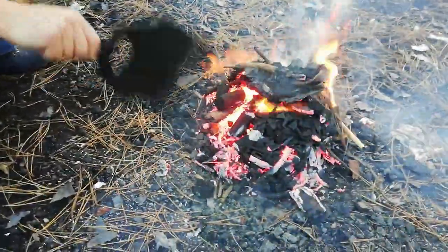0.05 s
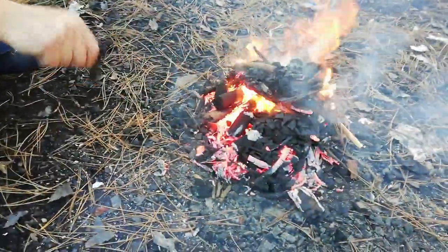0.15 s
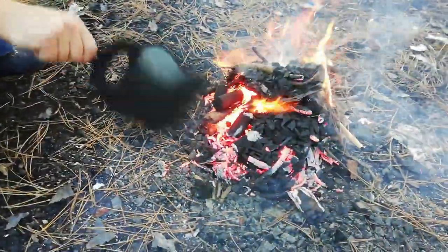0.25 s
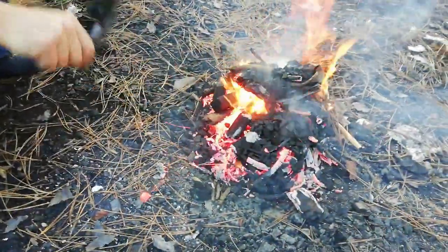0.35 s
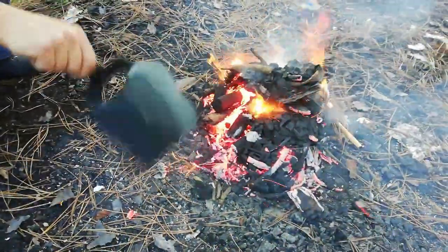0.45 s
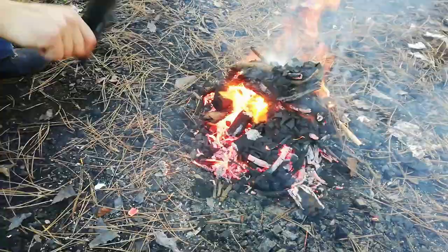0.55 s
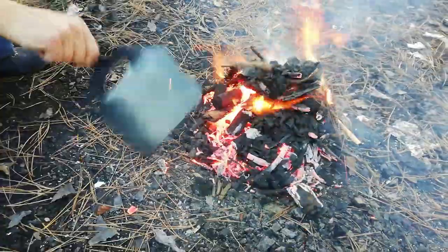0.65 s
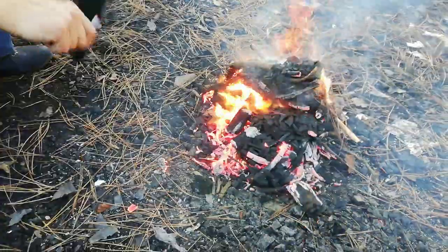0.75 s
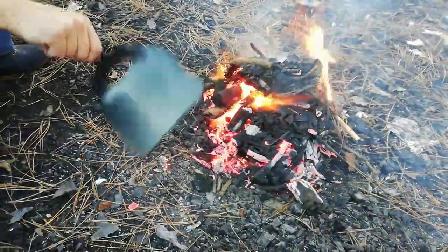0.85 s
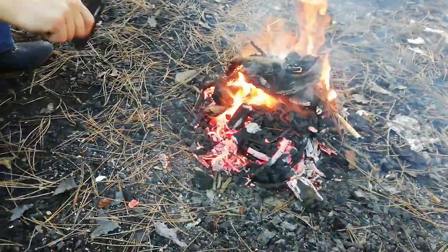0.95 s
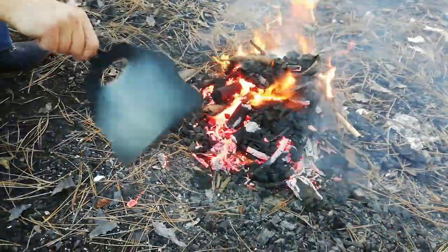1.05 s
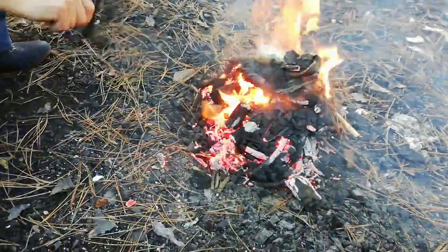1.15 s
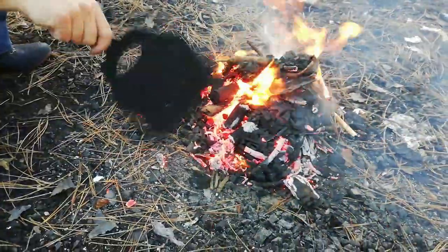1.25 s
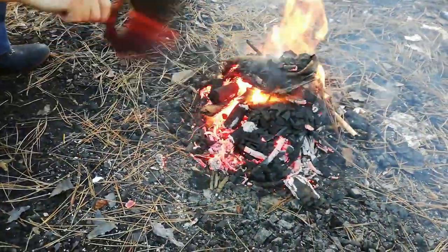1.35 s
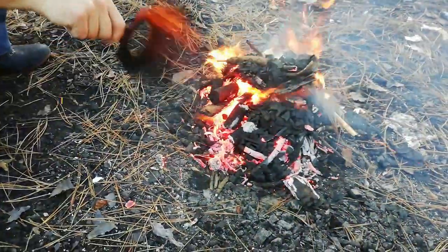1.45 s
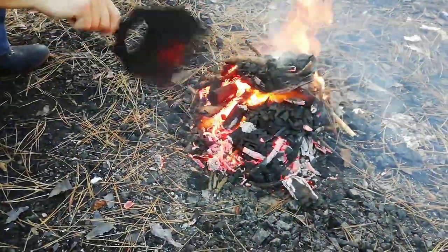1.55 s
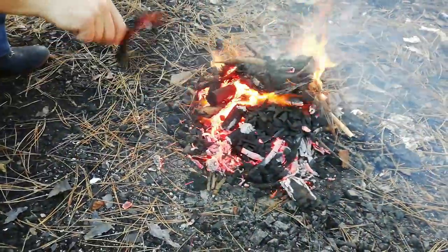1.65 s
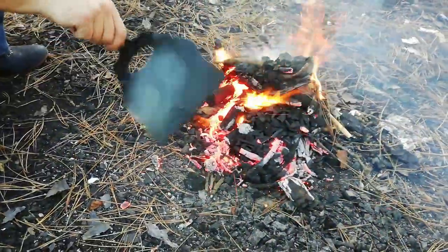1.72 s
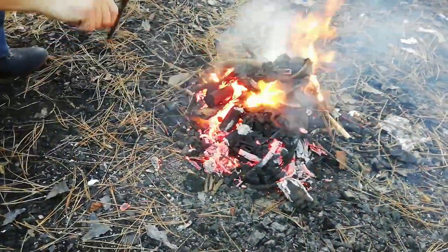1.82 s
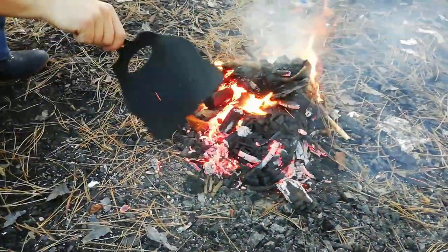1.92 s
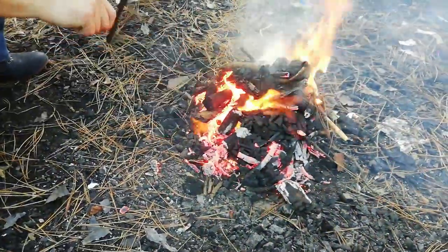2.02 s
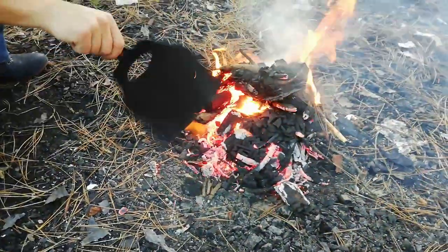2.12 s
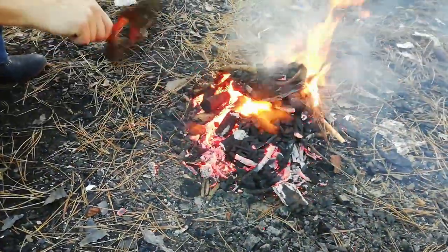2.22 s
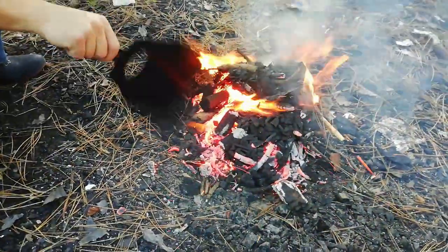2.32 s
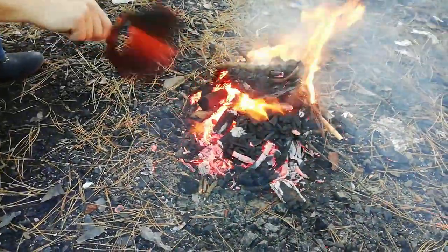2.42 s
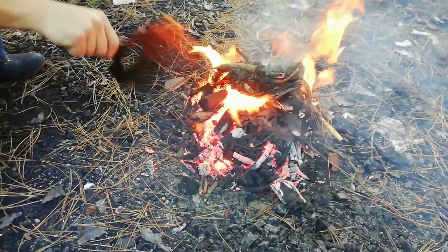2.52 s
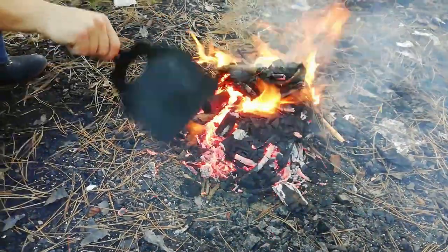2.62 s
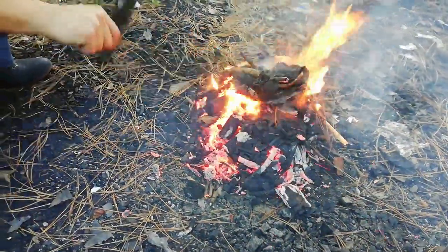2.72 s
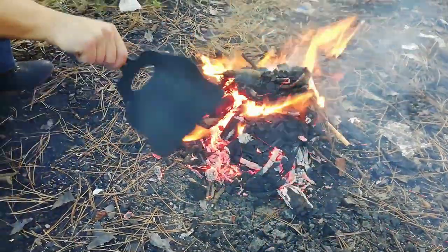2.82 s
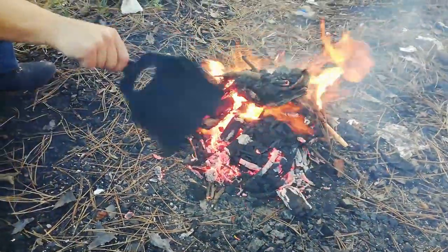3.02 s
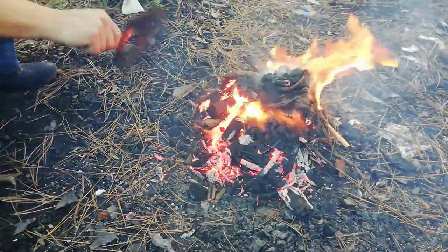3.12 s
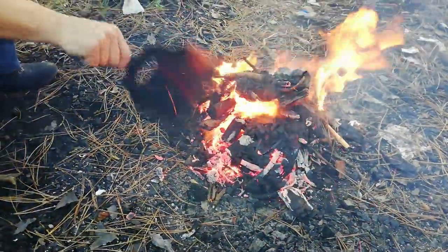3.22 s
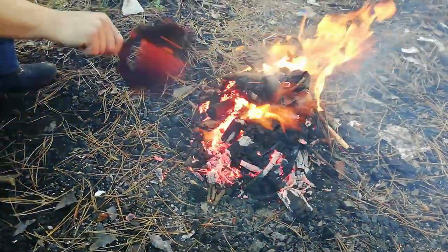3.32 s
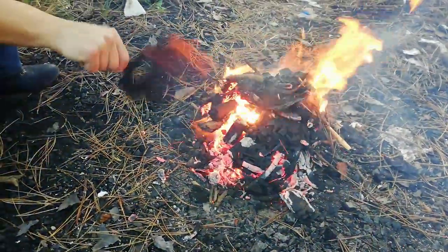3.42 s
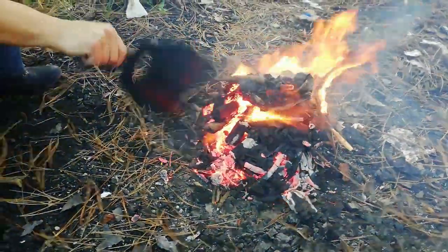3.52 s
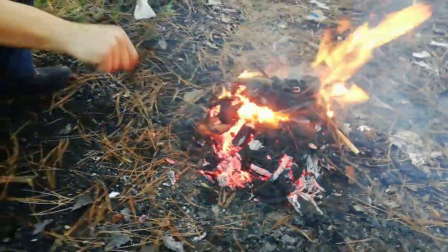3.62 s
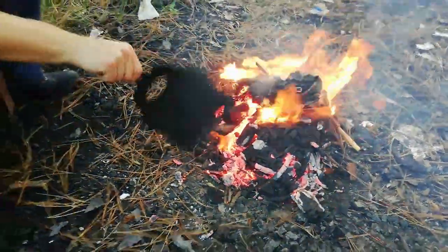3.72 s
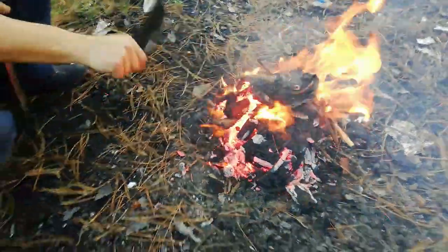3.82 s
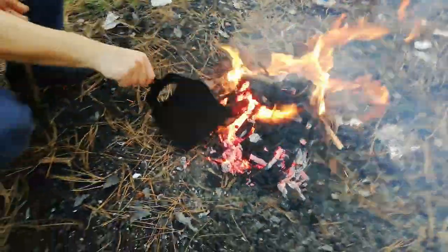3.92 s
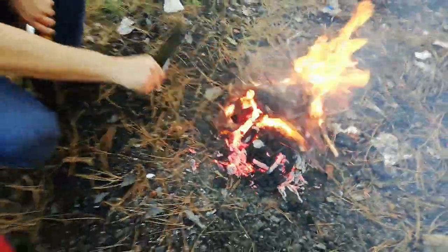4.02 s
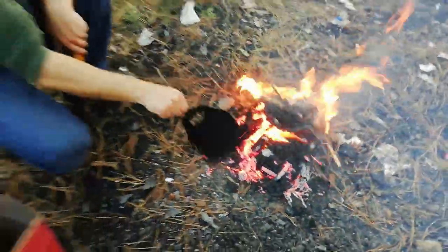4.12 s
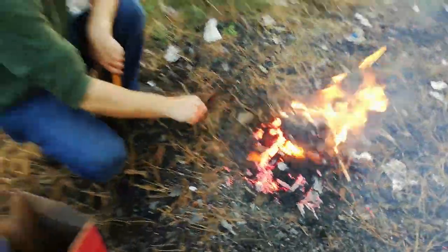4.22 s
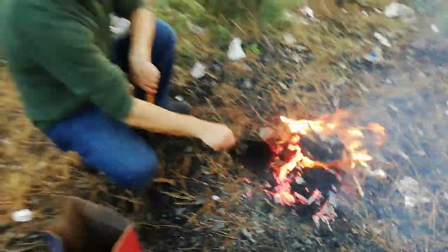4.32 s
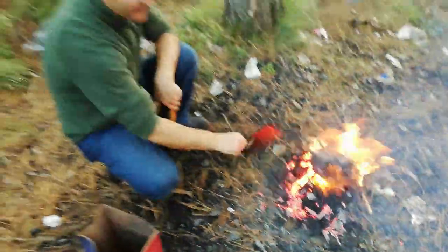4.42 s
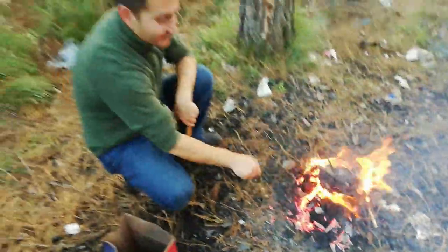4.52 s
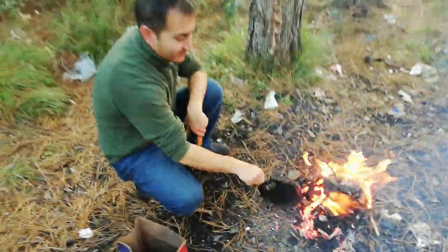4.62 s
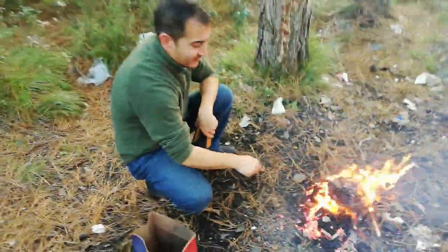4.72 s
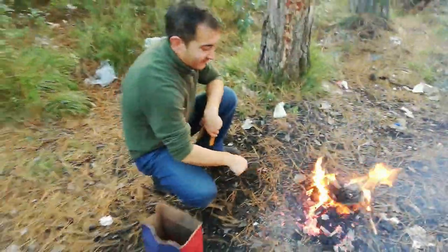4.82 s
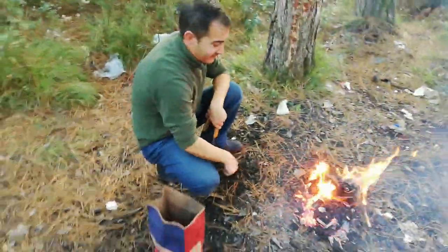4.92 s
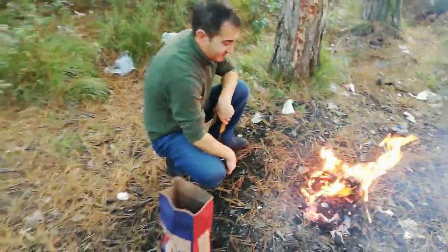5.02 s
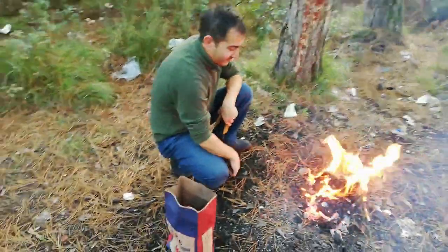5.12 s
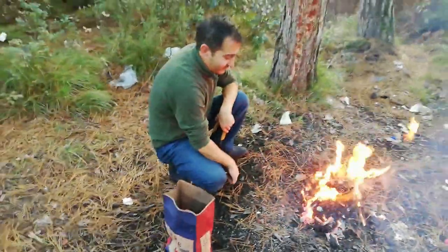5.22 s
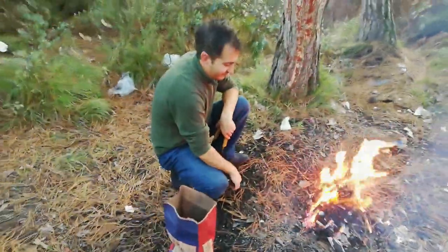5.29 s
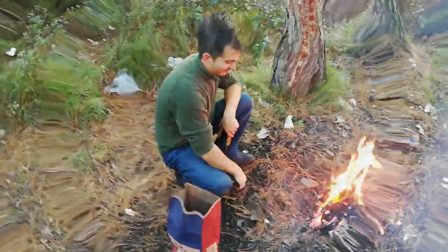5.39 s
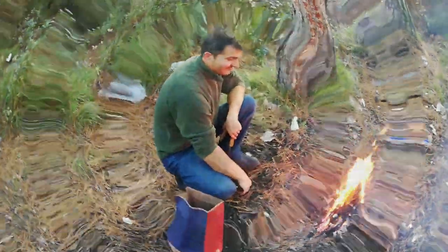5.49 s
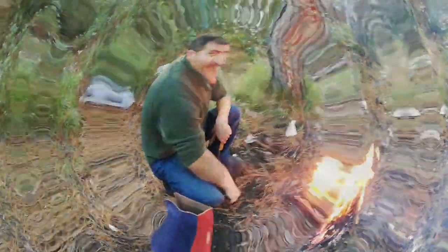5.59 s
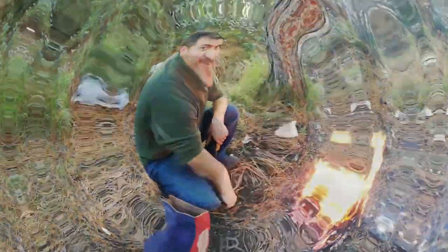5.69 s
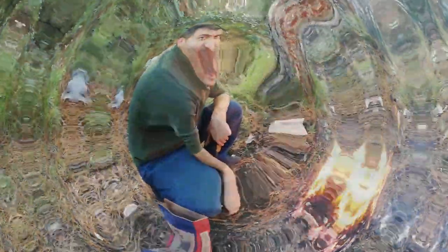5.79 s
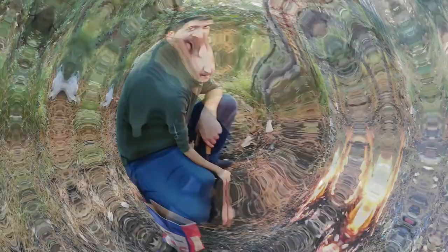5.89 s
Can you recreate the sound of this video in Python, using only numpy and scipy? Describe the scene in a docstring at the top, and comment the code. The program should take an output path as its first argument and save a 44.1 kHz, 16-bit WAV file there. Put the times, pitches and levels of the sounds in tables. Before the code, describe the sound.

A small charcoal fire pops and crackles sharply while quick fan strokes make its low flame roar pulse, then ease off.

```python
"""On a forest floor a small charcoal fire is fanned four or five times a second, close to a handheld phone.
Each stroke swells filtered noise into a roar; coals pop and crackle as sharp pulses with a short scatter.
Banded noise makes the fine sizzle, the hisses and the dry needles that rustle underfoot, mostly later on;
decaying sines make small pings, and a push of air with grit makes one dull knock.
The two microphone ports share the bass and differ in the treble; the loudest pops clip."""
import sys
import numpy as np
from scipy import signal
from scipy.fft import rfft, irfft
from scipy.io import wavfile
from scipy.ndimage import uniform_filter1d

SR = 44100
rng = np.random.default_rng(int(sys.argv[2]) if len(sys.argv) > 2 else 0)


def digitize_waveform(pressure):
    """Quantize a signal to 16-bit integers and store it at the path in sys.argv[1].

    Rows of a 2-D input are taken as channels; values are limited to [-1, 1].
    """
    field = np.atleast_2d(pressure).T
    bounded = np.clip(field, -1, 1)
    quanta = np.round(bounded * 32767).astype(np.int16)
    wavfile.write(sys.argv[1], SR, quanta)


N = 262395

# likeness of the noise at the two ports: (frequency [Hz], likeness [0 to 1])
PORT_LIKENESS = [(60, 0.99), (180, 0.99), (350, 0.85), (550, 0.6), (1650, 0.53), (4970, 0.027),
                 (15000, 0.04)]
# sizzle of the coals as the fanning heats them, which also lifts the crackles: (time [s], level [dB])
COAL_HEAT = [(0, -64), (.85, -61), (1.5, -60), (1.8, -55.5), (2.15, -62.5), (2.5, -55.5), (2.85, -58.5),
             (3.15, -55), (3.5, -61.5), (3.8, -47.5), (4.25, -52), (4.45, -58), (4.85, -51), (5.6, -57.5),
             (5.95, -69.5)]


def amp(db):
    """Decibels to amplitude."""
    return 10 ** (np.asarray(db) / 20)


def evened(x):
    """Scale a sound to an RMS of one."""
    return x / np.sqrt(np.mean(x ** 2) + 1e-20)


def read(points, hz):
    """Read a curve over frequency, with straight lines on a log scale."""
    f, value = np.transpose(points)
    return np.interp(np.log(hz + 1), np.log(f + 1), value)


def curve(table):
    """Draw a curve over time for every sample of the scene."""
    return np.interp(np.arange(N) / SR, *np.transpose(table))


def add(mix, s, sound):
    """Mix a sound in at s seconds, cut off at the end of the scene."""
    at = max(round(s * SR), 0)
    part = mix[:, at:at + sound.shape[-1]]
    part += sound[..., :part.shape[1]]


def causal(db):
    """Spectrum of the shortest causal pulse with the given gain (minimum phase)."""
    log_gain = np.maximum(db, -100) * np.log(10) / 20
    full = np.concatenate([log_gain, log_gain[..., -2:0:-1]], -1)
    phase = -signal.hilbert(full).imag[..., :log_gain.shape[-1]]
    return np.exp(log_gain + 1j * phase)


def noise(colour, size, patchy_db, flicker_db):
    """Two-port noise of unit level, with drifting patches and a flicker shared by all bands."""
    # level difference of the ports: (frequency [Hz], left over right [dB])
    port_balance = [(60, -0.5), (150, 0.5), (380, -3), (950, -3), (2380, -7), (5980, -2), (15000, 5)]
    hop = size // 4
    frames, hz = N // hop + 5, np.fft.rfftfreq(size, 1 / SR)
    a, b, c, d, patches = rng.standard_normal((frames, len(hz), 5)).T
    patches = uniform_filter1d(patches, size=8, axis=0)
    patches = evened(uniform_filter1d(patches, size=8, axis=1))
    flicker = rng.standard_normal(frames)
    same = np.clip(read(PORT_LIKENESS, hz), -1, 1)[:, None]
    left, other = a + 1j * b, c + 1j * d
    z = np.array([left, same * left + np.sqrt(1 - same ** 2) * other])
    z *= amp(read(colour, hz)[:, None] + patchy_db * patches + flicker_db * flicker)
    z *= amp(np.multiply.outer([.5, -.5], read(port_balance, hz)))[..., None]
    out = signal.istft(z, nperseg=size, noverlap=size - hop)[1][:, :N]
    return out / np.sqrt(np.mean(out.mean(0) ** 2))


def rustle():
    """Dry needles rustle: mid-band noise with a strong flicker, ridden by a level curve."""
    # colour of the rustle: (frequency [Hz], relative density [dB])
    rustle_colour = [(410, -29), (700, -10.5), (1390, -3), (2020, 0.5), (2830, -10), (3370, -8.5),
                     (5000, -12), (6500, -64), (11000, -120)]
    # movement in the needles: (time [s], level [dB])
    needle_level = [(0, -58), (.3, -71), (3.6, -70.5), (3.8, -54), (4.1, -58.5), (4.45, -55.5),
                    (4.85, -55.5), (5.5, -60.5), (5.82, -63.5), (5.95, -77.5)]
    return noise(rustle_colour, size=256, patchy_db=2.0, flicker_db=5.0) * amp(curve(needle_level))


def sizzle():
    """The coals sizzle: bright, patchy, flickering noise that follows their heat."""
    # colour of the sizzle: (frequency [Hz], relative density [dB])
    sizzle_colour = [(1470, -41), (2500, -25), (3130, -10.5), (5340, -8), (7470, -6.5), (9720, -4),
                     (12500, -14), (15200, -13.5), (15900, -34), (16900, -42)]
    return noise(sizzle_colour, size=256, patchy_db=4.5, flicker_db=5.0) * amp(curve(COAL_HEAT))


def hisses():
    """Grainy noise in one band each, with a quick rise; the low puff is far more alike at the two ports."""
    # gas jets, crushed needles and one low puff of wind:
    # (time [s], length [s], centre [Hz], width at half amplitude [Hz], level before the fades [dB])
    bursts = [(1.022, 0.0051, 6750, 1480, -17), (1.023, 0.17, 7150, 2970, -48),
              (4.994, 0.13, 54, 69, -47.5), (3.843, 0.16, 2040, 2500, -51.5),
              (4.318, 0.13, 8400, 4550, -43), (4.328, 0.1, 2320, 2400, -47.5),
              (5.471, 0.074, 5800, 5230, -44.5)]
    mix = np.zeros((2, N))
    hz = np.fft.rfftfreq(8192, 1 / SR)
    for s, length, centre_hz, width_hz, db in bursts:
        left, other, grain = rng.standard_normal((8192, 3)).T
        same = np.clip(read(PORT_LIKENESS, centre_hz), 0, 1)
        right = same * left + np.sqrt(1 - same ** 2) * other
        band = irfft(rfft([left, right]) / (1 + ((hz - centre_hz) / width_hz * 2) ** 2))
        grain = amp(0.55 * evened(uniform_filter1d(grain, size=150)))
        u = np.arange(8192) / SR / length
        fades = np.clip(14.0 * u, 0, 1) * np.clip(3.6 * (1 - u), 0, 1)
        add(mix, s, amp(db) * evened(band * grain) * fades)
    return mix


def pings():
    """Small struck things ring as single sines that start softly and die away evenly in dB."""
    # chips of coal and twigs:
    # (time [s], pitch [Hz], level before the soft start [dB], t60 [s], left over right [dB])
    struck = [(.827, 14200, -35., .05, 6.), (1.0206, 7200, -1., .005, -3.), (4.6004, 1500, -25., .012, -4.),
              (4.7551, 1700, -28., .006, -4.), (4.7912, 2000, -24., .008, -2.)]
    mix, t = np.zeros((2, N)), np.arange(4000) / SR
    for s, hz, db, t60, pan_db in struck:
        soft_start = 1 - np.exp(-t * hz)
        ring = amp(db - 60 * t / t60) * soft_start * np.sin(2 * np.pi * hz * t)
        add(mix, s, ring * amp([[pan_db / 2], [-pan_db / 2]]))
    return mix


def knock():
    """The fan knocks the pile: a push and pull of air, with decaying dull noise for the falling grit."""
    # (time [s], push gain [dB], push time scale [s], grit gain [dB], grit t60 [s])
    thud = (3.5186, -19., .00045, -28., .025)
    s, db, time_scale, grit_db, t60 = thud
    mix, t = np.zeros((2, N)), np.arange(4000) / SR
    u = t / time_scale
    push = 3.5 * u * (2 - u) * np.exp(-u) / 2
    grit = signal.lfilter(*signal.butter(1, 2500, fs=SR), rng.standard_normal((2, len(t))))
    add(mix, s, amp(db) * push + amp(grit_db - 60 * t / t60) * evened(grit))
    return mix


def flames():
    """Each stroke swells the low lumpy roar and a brighter flutter, quick up and slower down, over a steady burn."""
    # fan strokes: (time [s], roar gain [dB], time scale of the swell [s])
    strokes = [(.077, -40.5, 0.035), (0.297, -39.5, 0.038), (0.514, -35.5, 0.019), (0.692, -38.5, 0.081),
               (.926, -41, 0.043), (1.136, -38, 0.057), (1.356, -37.5, 0.049), (1.565, -39.5, 0.082),
               (1.775, -41.5, 0.082), (2.007, -35.5, 0.045), (2.224, -39, 0.038), (2.427, -39, 0.08),
               (2.655, -37.5, 0.057), (2.877, -39, 0.048), (3.103, -38, 0.051), (3.31, -35.5, 0.049),
               (3.527, -33, 0.042), (3.736, -38.5, 0.1), (3.94, -43.5, 0.065), (4.213, -45, .067),
               (4.447, -42, 0.054), (4.671, -42.5, 0.044)]
    # colours of the three layers: (frequency [Hz], relative density [dB])
    roar_colour = [(8.8, -38), (15, -2), (87, -2.5), (157, 2.5), (213, -6), (289, -23.5), (374, -8),
                   (491, -25.5), (616, -21.5), (700, -21.5), (910, -31.5), (1540, -120)]
    flutter_colour = [(240, -35), (400, -10.5), (605, -19.5), (746, -7.5), (1370, -11.5), (2350, -24.5),
                      (3000, -24.5), (3900, -23), (6600, -120)]
    burn_colour = [(8.8, -56), (15, 0), (43, -6), (123, -6), (380, -21.5), (700, -34), (910, -49),
                   (1540, -120)]
    # steady burn, fading as the fanning stops and the phone turns away: (time [s], level [dB])
    burn_level = [(0, -44), (.6, -43), (1.8, -47), (4.6, -48), (5.0, -57.5), (5.82, -55), (5.9, -65)]
    flutter_db = -16  # under the roar

    s, db, time_scale = np.transpose(strokes)[..., None]
    t = np.arange(0, N + 64, 64) / SR
    u = np.maximum(t - s + 0.014, 0) / time_scale  # the swell begins 14 ms ahead of the listed time
    gusts = (u * np.exp(1 - u ** 1.556) * amp(db)) ** 2
    roar_power = np.interp(np.arange(N) / SR, t, gusts.sum(0))
    burn = amp(curve(burn_level))
    burn_power = burn ** 2 + 0.08 * roar_power
    flutter_power = roar_power * amp(flutter_db) ** 2 + (burn * amp(-17.0)) ** 2

    fire = noise(roar_colour, size=1024, patchy_db=2.0, flicker_db=3.0) * np.sqrt(roar_power)
    fire += noise(burn_colour, size=1024, patchy_db=3.0, flicker_db=2.5) * np.sqrt(burn_power)
    fire += noise(flutter_colour, size=512, patchy_db=3.0, flicker_db=2.5) * np.sqrt(flutter_power)
    lumps = amp(1.95 * evened(uniform_filter1d(rng.standard_normal(N), size=900)))
    return lumps * fire  # the whole flame shakes at once


def pops(rows):
    """Each pop is one sharp pulse, then a few ms of thinner scatter from coals and ground, different at each port."""
    # colour of a pop: (frequency [Hz], relative level [dB])
    pop_colour = [(500, -38.5), (1400, -22), (2200, -32.5), (2900, -14.5), (5300, -10.5), (6900, -6),
                  (9400, -1), (11300, -10), (14000, -16), (17000, -29.5)]
    # the ports ring at different pitches: (frequency [Hz], left over right [dB])
    port_ring = [(500, 15.5), (1500, -7.5), (4800, 0.5), (6700, -5), (8900, 2), (10200, 12), (12500, 0)]
    # how much of a pop's side shading each pitch gets: (frequency [Hz], share [0 to 1])
    shade = [(500, 0.11), (5000, 0.096), (9700, 0.52), (16000, 0.67)]
    # the phone turns away: (time [s], mean delay of the right port behind the left [samples])
    turn = [(3.9, .5), (4.4, 4)]

    s, db, body_db, pan_db = np.transpose(rows)[..., None]
    # fuller pops throw more scatter, pops leaning to the left port less
    scatter_db = -15 + 0.4 * body_db - 0.082 * pan_db
    hz, t = np.fft.rfftfreq(1024, 1 / SR), np.arange(1024) / SR
    low = 1 / (1 + (hz / 4300) ** 6)
    colour_db = read(pop_colour, hz) + body_db * low
    side_db = read(port_ring, hz) + pan_db * read(shade, hz)

    luck = rng.standard_normal((len(rows), 5, 1024)).transpose(1, 0, 2)
    sparse = luck[:2] * (0.3 + (abs(luck[2:4]) > 1.8))  # faint noise with rare strong grains
    onset = 1 - np.exp(-(t / .0009) ** 2)
    swell = onset * np.exp(-(t / 0.0034) ** 2) + 0.14 * amp(-60 * t / 0.1)
    fade = np.clip(2 - t / 0.013, 0, 1)
    scatter = rfft(sparse * swell * amp(scatter_db) * fade) * amp(-4. * low)

    lag = np.interp(s, *np.transpose(turn)) + .6 * luck[4, :, :1]
    delay = 8 + np.multiply.outer([-.5, .5], lag)  # samples
    direct = np.exp(-2j * np.pi * hz / SR * delay)
    port_db = colour_db + np.multiply.outer([.5, -.5], side_db)
    sound = irfft((direct + scatter) * causal(port_db))
    power = (abs(signal.hilbert(sound)) ** 2).mean(0)
    sound *= amp(db) / np.sqrt(power.max(-1, keepdims=True))
    mix = np.zeros((2, N))
    for k in range(len(rows)):
        add(mix, s[k, 0], sound[:, k])
    return mix


def crackles(count=800):
    """Small pops at random times, most of them faint, whose level follows the sizzle."""
    u, v = rng.random((count, 2)), rng.standard_normal((count, 2))
    over_db = np.minimum(12.5 - 4.45 * np.log(u[:, 1]), 31.)  # a few stand far above the sizzle
    db = curve(COAL_HEAT)[(u[:, 0] * N).astype(int)] + over_db
    body_db, pan_db = -1.5 + 6. * v[:, 0], 6. + 7. * v[:, 1]
    return pops(np.c_[u[:, 0] * N / SR, db, body_db, pan_db])


def coal_pops():
    """The loudest pops: coals burst at set times, each with its own weight and side."""
    # (time [s], peak envelope level [dB], extra body below about 4 kHz [dB],
    #  left over right before the share of each pitch [dB])
    loud_pops = [(.2894, -3.5, 5.5, 4), (.4001, -23.5, -22, 10), (.5132, 1, -2, -3), (.8606, -20.5, -5, 25),
                 (.9143, .5, -5.5, 0), (1.0205, -2, 10, -2), (1.1933, -19, -4, 8), (1.2351, -4.5, -6, 11),
                 (1.3249, -22, -9, 5), (1.4109, -20, 8, 33), (1.4602, -6, -1.5, -15), (1.4654, -1, -5, 8),
                 (1.5351, -7.5, -8, 9), (1.5785, -14.5, -5, 8), (1.629, -14.5, 1, -1),
                 (1.6812, -20, -10, 8), (1.7237, -5.5, 8.5, 26), (1.7307, -19.5, 22, 6),
                 (1.7427, -3, 7.5, 14), (1.7788, -18.5, -1, -7), (1.858, -17.5, 3, 7),
                 (2.0699, -19.5, 11, 1), (2.0901, -1.5, -18, 19), (2.0963, -16.5, 10, -16),
                 (2.1254, -15, 0.5, -10), (2.2085, -24.5, 5, -22), (2.2317, -16.5, 6.5, 8),
                 (2.2542, -22, -13, 0), (2.2782, 1, 2, -6), (2.341, -14, -1, -2), (2.3624, -4.5, 0, -14),
                 (2.4178, -11, 9.5, 19), (2.5213, -14.5, 3, 21), (2.5857, -14, -2, 26),
                 (2.6029, -1, 2.5, 22), (2.6194, -1.5, -1, -5), (2.647, -21, 9, 7), (2.692, -18.5, 4, 6),
                 (2.7258, -18, 5, -2), (2.7571, -20, 4, -9), (2.8301, -20, 10, 3), (2.8441, -12.5, 0, -12),
                 (2.858, -18, -4, 14), (2.879, -18, 3.5, 2), (2.9165, -5, -3, 24), (2.9265, -11.5, -5, 5),
                 (2.9559, -4.5, 0, 12), (2.9698, -24, -9, 12), (3.0103, -7, -4, 7), (3.0694, -9, -5.5, 2),
                 (3.0821, -21, -8, -21), (3.1221, -17, 4, 2), (3.1309, -16.5, 4, 1), (3.1396, -15, 4, 4),
                 (3.1631, -13, -9, 9), (3.1822, -24, -16, 3), (3.2, -11.5, -3, -7), (3.2615, -14.5, -6, 15),
                 (3.2674, -14.5, -20, 9), (3.3477, -15.5, -14, -7), (3.3603, -4.5, 2, -2),
                 (3.3741, -17, 0, 7), (3.4145, -15.5, -3, 27), (3.4357, -18, -2, 21),
                 (3.4676, -7.5, 0, -10), (3.4819, -13, 19, 18), (3.5185, -16, 21, 9), (3.5783, -5, -7, 12),
                 (3.5939, .5, -1, -4), (3.6628, -7, 3, 1), (3.7402, -19.5, -18, 25),
                 (3.8291, -29.5, 31, 16), (3.867, -9, 0, 8), (3.8831, -12, 9, 4), (3.9269, -12.5, 10, 32),
                 (3.9368, -10, -1, 19), (3.9779, -4, 0.5, -2), (4.0659, -19.5, 1, 11),
                 (4.1122, -13.5, -3, 23), (4.1264, -16.5, 5, 10), (4.1573, -11, -6, 3),
                 (4.1719, -1, 2.5, 17), (4.2842, -15, -2, 3), (4.3072, -16, 1, 9), (4.3917, -9, -10, -11),
                 (4.4013, -4.5, -15, -14), (4.5243, -24.5, 17.5, 6), (4.5705, -15, 2.5, -1),
                 (4.6125, -16, 3, 4), (4.7915, -11.5, 12.5, 1), (4.8999, -19.5, -9, 2),
                 (4.9634, -15, -18, 4), (5.068, -18, -11, 3), (5.1228, -21, -12, 18),
                 (5.1462, -11, 5.5, 19), (5.2819, -20.5, -17, 20), (5.3364, -3.5, -1.5, 24),
                 (5.3879, -15, 5.5, 17), (5.4307, -24.5, -1, 6), (5.4823, -14, 19.5, 23), (5.6, -16, 3, 13),
                 (5.861, -8, -0.5, 25), (5.8699, -34, -4, 16)]
    return pops(loud_pops)


def scene():
    """Sum the layers, from the background to the loudest pops."""
    background = rustle() + sizzle() + hisses() + pings() + knock()
    return background + flames() + crackles() + coal_pops()


def record(dry):
    """The loudest pops clip at full scale; then a steep low-pass limits the band."""
    edge_hz = 16850
    edge = signal.firwin(255, edge_hz, window=("kaiser", 9), fs=SR)[None]
    return signal.oaconvolve(np.clip(dry, -1, 1), edge, "same")


dry = scene()
out = record(dry)
digitize_waveform(out)
```